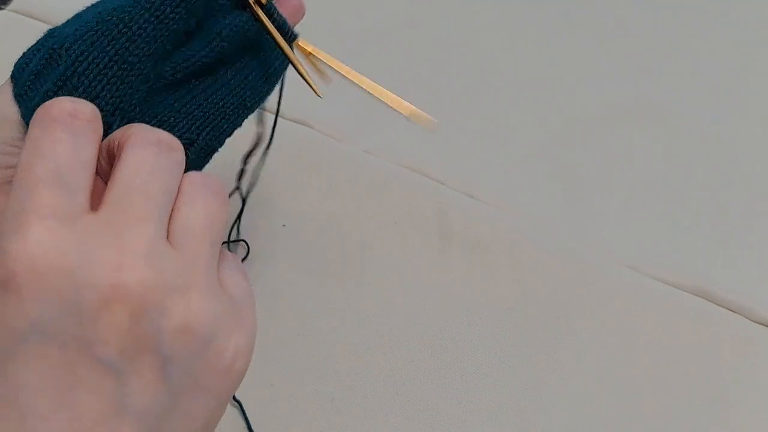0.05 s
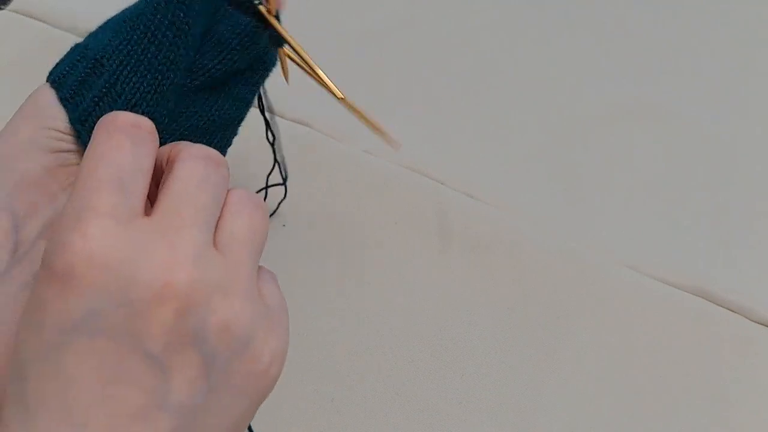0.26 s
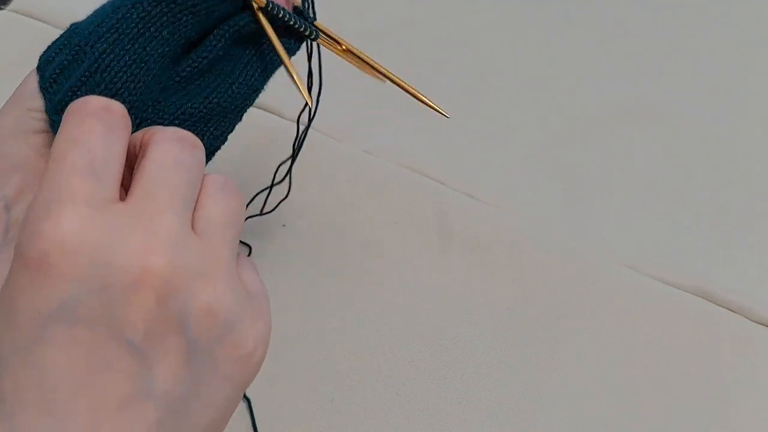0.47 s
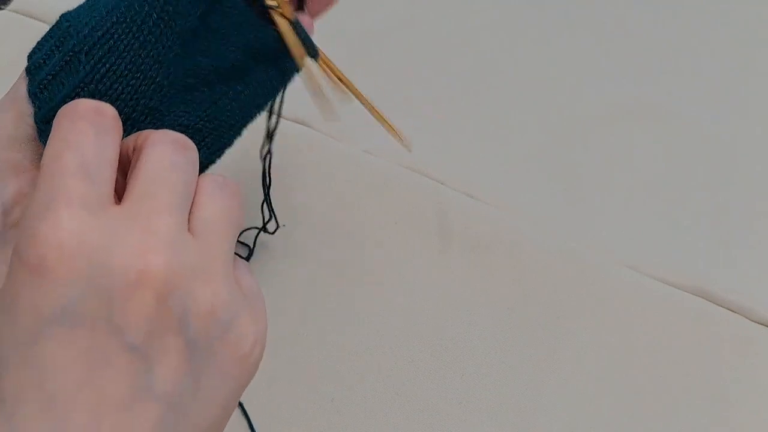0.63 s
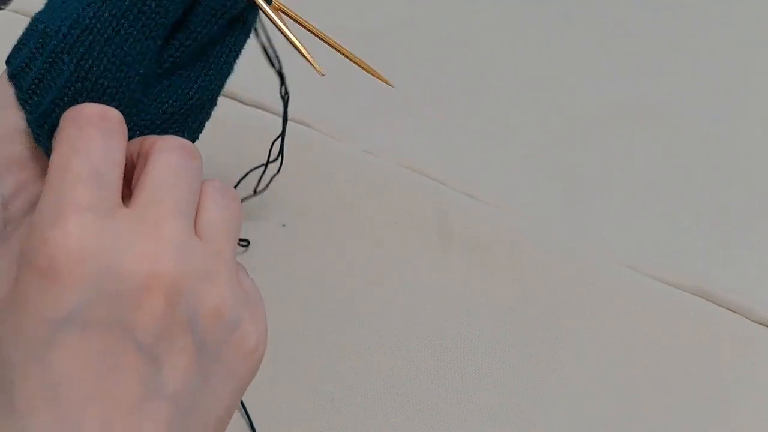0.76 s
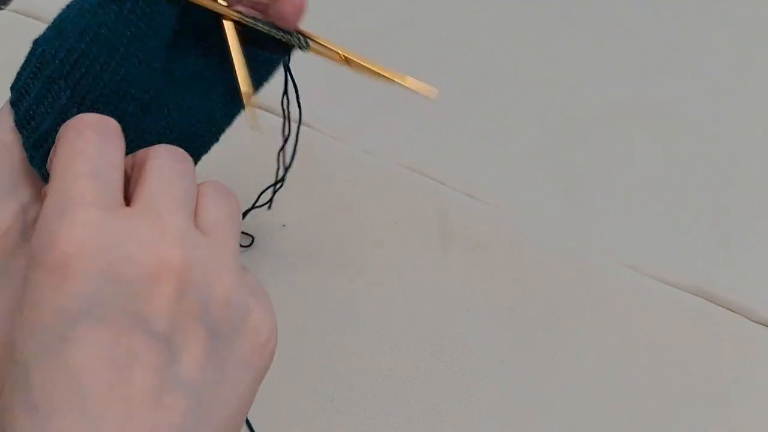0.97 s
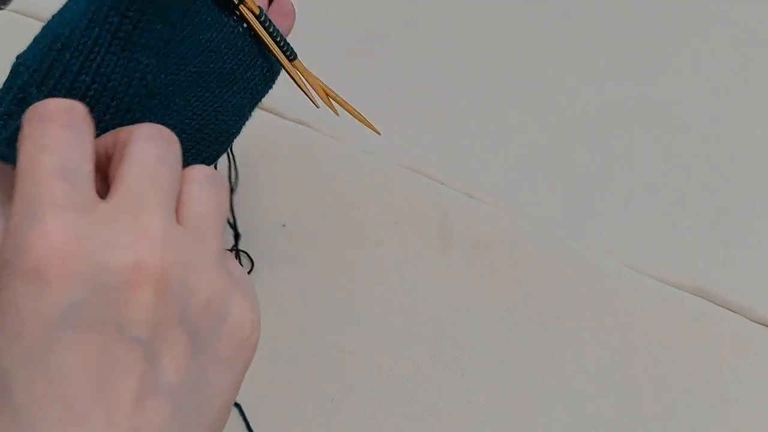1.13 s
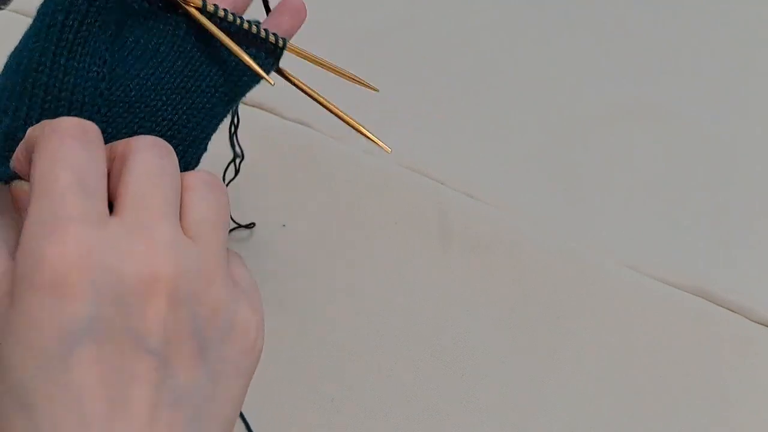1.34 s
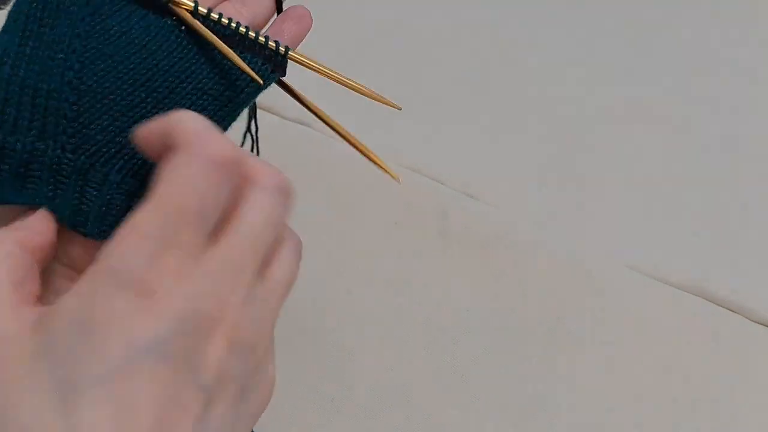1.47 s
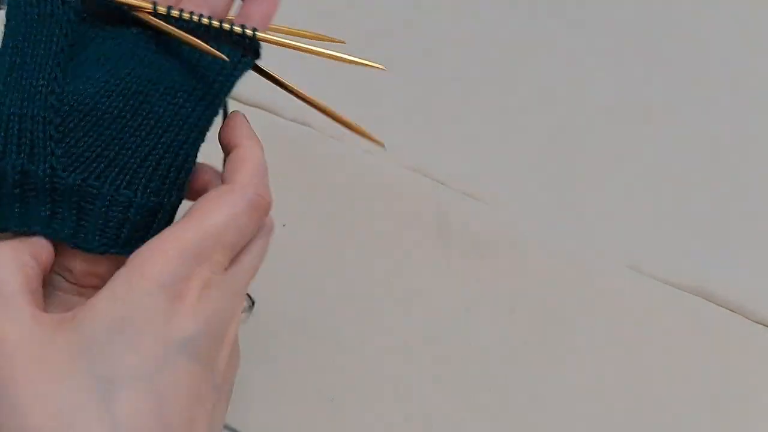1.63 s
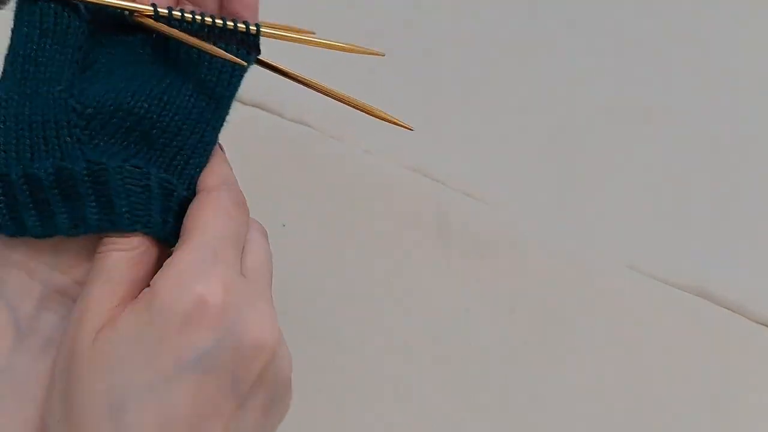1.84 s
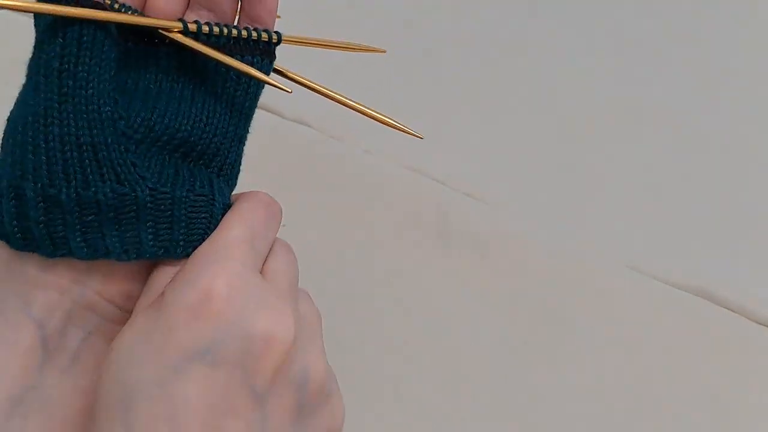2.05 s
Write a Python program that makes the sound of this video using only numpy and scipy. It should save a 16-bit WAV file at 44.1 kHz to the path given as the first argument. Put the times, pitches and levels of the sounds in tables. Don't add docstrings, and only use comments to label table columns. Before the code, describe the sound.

Close to the microphone in a quiet room, metal knitting needles clink, bounce and rattle in several bright bursts, with a low table rumble and wool rustle, then only faint ticks and a few dry taps remain.

```python
import sys
import numpy as np
from scipy import signal
from scipy.fft import rfft, irfft
from scipy.io import wavfile
from scipy.ndimage import uniform_filter1d

SR = 44100
rng = np.random.default_rng(int(sys.argv[2]) if len(sys.argv) > 2 else 0)


def wrap_up_sound(samples):
    columns = np.atleast_2d(samples).T
    tamed = np.clip(columns, -1, 1)
    steps = np.round(tamed * 32767).astype(np.int16)
    wavfile.write(sys.argv[1], SR, steps)


def invert_db(level):
    return 10 ** (np.asarray(level, dtype=float) / 20)


N = 92610

# (time [s], level [dB], pitch [Hz], length [s])
NUDGES = [(0., -31.5, 51.53, 0.1), (0.118, -34, 53.77, 0.15), (0.218, -38, 54.5, 0.12),
          (0.316, -38, 54.4, 0.27), (0.477, -28, 50.6, 0.092), (.6, -23, 48.05, 0.22),
          (0.762, -23.5, 47.3, 0.13), (0.865, -25, 46.45, 0.16), (1.054, -41, 46.46, 0.3),
          (1.215, -35.5, 44.84, 0.08), (1.315, -50, 40.43, 0.16), (1.382, -39.5, 40.2, 0.14),
          (1.481, -38.5, 42.2, 0.077), (1.57, -37.5, 43.56, 0.051), (1.675, -37, 45.3, 0.095),
          (1.755, -38, 46.5, 0.074), (1.825, -41, 43.75, 0.1), (1.948, -44, 43.8, 0.19),
          (2.088, -45, 42.8, 0.16)]
# (multiple of hum, level [dB])
BUZZ_OVERTONES = [(2, -28), (3, -25), (5, -32)]
SWAY_DB, SWAY_HZ = -49.5, 36

# (time [s], level [dB])
RUB = [(0, -50), (.05, -47), (.12, -58), (0.192, -42), (.4, -53.5), (.45, -61), (0.521, -41),
       (0.849, -47.5), (.93, -56), (0.988, -44), (1.04, -52.5), (1.2, -54.5), (1.3, -57), (1.432, -50.5),
       (1.752, -66), (1.801, -44), (1.872, -62.5), (2.1, -50.5)]
# (frequency [Hz], density [dB per Hz])
WOOL_SPECTRUM = [(1500, -14), (2500, -15), (4200, -14.5), (10200, 0), (12100, -11), (14200, -10.5),
                 (16000, -11.5)]

# (frequency [Hz], density [dB per Hz])
AIR_SPECTRUM = [(35, -59), (60, -0.5), (252, -11), (384, -15.5), (497, -19), (815, -19.5), (14300, -39),
                (16500, -45)]
AIR_DB, STIR_DB = -50.5, 2.5
SLEEVE_DB, SLEEVE_AT_S, SLEEVE_SPAN_S = 2.5, 1.5, .15

# (time [s], crack [dB], ring [dB], tilt [dB per octave])
FIRST_HITS = [
    (.2016, 1.5, -4, -0.5),
    (.2048, -2, -7, -2),
    (.2075, -10.5, -43, -8),
    (.2122, -21, -20, 11),
]
REBOUND_HITS = [
    (.2195, -13, -6.5, 7),
    (.2232, -32, -33, -2),
    (.2257, -5, -12.5, 0),
    (.2288, -26, -18, 2),
    (.2341, -11.5, -35, -3.5),
    (.3160, -12, -22.5, -2.5),
    (.3224, -19, -34, 1),
]
RATTLE_HITS = [
    (.4935, -30.5, -40, -9),
    (.5344, -2, -8.5, -3.),
    (.5366, -3, -20, -3),
    (.5490, -3.5, -11, 6),
    (.5529, -20, -11, -2.5),
    (.559, -25, -20, 1),
    (.5685, -14, -13, -2),
    (.5722, -17, -26, 3),
]
PAIR_HITS = [
    (.6200, -3.5, -13.5, 2),
    (.6277, -9, -13, 13),
]
FREE_HITS = [
    (.6870, -18, -5.5, -2.5),
    (.6950, -20.5, -13, 1),
]
KNOCK_HITS = [
    (.7840, -4.5, -8.5, 6),
    (.7915, -15, -18.5, 2),
    (.7955, -27, -21, 6.5),
    (.799, -35, -27, 0),
]
SLIP_HITS = [
    (.8715, -17, -20, 0.86),
    (.8881, -26, -19.5, 5.8),
    (.8902, -30, -30, 4.5),
]
LAST_HITS = [
    (1.0570, -34, -22, 2.1),
    (1.0590, -14, -3, 3.5),
    (1.0622, -33, -16.5, 2.33),
]
AFTER_HITS = [
    (1.1151, -21, -21.5, 0),
    (1.1185, -29, -26, 2),
    (1.133, -34, -31, 0),
]
TICK_HITS = [
    (1.2215, -38, -36, 5),
    (1.2241, -19, -25, 4),
    (1.2272, -29, -30.5, -1),
    (1.2495, -35, -37, -2),
    (1.2535, -24, -35, -1.5),
    (1.2562, -32, -34, 3),
    (1.2762, -34, -44, 1),
]
SMALL_HITS = [
    (1.5512, -25.5, -25.5, 1.5),
    (1.597, -32, -46, 1),
    (1.6581, -22, -38, 3),
    (1.6624, -26.5, -50, 0),
    (1.7893, -23.5, -44, 5),
    (1.795, -30, -53, -2),
    (2.0687, -36, -42, -10),
]

# (frequency [Hz], level [dB], T60 [s])
FIRST_MODES = [(830, -41, 0.047), (2270, -22.5, 0.096), (4367, -7.5, 0.061), (5680, -14, 0.033),
               (6990, -10.5, 0.062), (9800, -27, 0.064), (10130, 5, 0.018), (10720, 5.5, 0.03),
               (13550, -4, 0.041)]
REBOUND_MODES = [(4370, -19, 0.028), (5640, -10.5, 0.026), (7040, -5.5, 0.035), (9440, -2, .03),
                 (10430, 3.5, 0.034), (10670, 4, 0.021), (14100, -0.5, 0.03)]
RATTLE_MODES = [(3030, -13.5, 0.012), (4010, -18, 0.033), (5560, -10, 0.031), (6070, -10, 0.038),
                (7140, -17, .03), (8300, -20, 0.024), (9940, -3, 0.069), (10680, 3, 0.033),
                (11140, 6, 0.016), (12700, -7, .025), (14100, 0, 0.024)]
PAIR_MODES = [(4330, -16, .03), (7000, -9, .11), (9000, -16, .03), (10200, -6, .04), (13500, -2, .02),
              (14100, 0, .017)]
FREE_MODES = [(839, -42, 0.061), (2170, -35.5, .078), (4396, -9, 0.035), (6980, 1, 0.047),
              (9880, 1.5, 0.037), (10060, -9, 0.13), (13790, -8, 0.066)]
KNOCK_MODES = [(860, -16, 0.046), (1830, -11.5, 0.034), (2300, -17.5, 0.11), (4130, -10, 0.027),
               (6000, -11.5, 0.036), (7030, -5.5, 0.057), (8540, -1.5, 0.027), (9890, -7, 0.077),
               (9700, -8, 0.091), (10600, -9, 0.036), (13860, -3.5, 0.038), (15000, -8, 0.023)]
SLIP_MODES = [(3850, -7.5, 0.024), (5350, -9, 0.036), (6500, -3, 0.023), (8320, 2.5, .018),
              (9600, -6, 0.03), (11040, -2.5, 0.028), (14800, -2, 0.016)]
LAST_MODES = [(2285, -21.5, 0.045), (4186, -14, 0.021), (4460, -12.5, 0.026), (5730, -17, 0.037),
              (7226, -20, 0.047), (7780, -17.5, .04), (10100, 5.5, 0.019), (10400, -13, 0.051),
              (13550, -12, .03)]
AFTER_MODES = [(4250, -3, 0.016), (5740, -26, .02), (7950, -8, 0.031), (10200, 0, .02),
               (11600, -0.5, 0.031), (14000, -5, .03), (15700, -6, .016)]
TICK_MODES = [(3660, -16, 0.025), (6000, -4.5, 0.039), (9230, 1, 0.027), (10400, 2, 0.023),
              (12300, -18, 0.018), (13900, -3, .025)]
SMALL_MODES = [(5170, -13, 0.035), (6400, -14.5, 0.035), (8390, 4.5, 0.027), (9700, -3.5, 0.033),
               (14034, -12, .03), (14900, -20, 0.024)]

# (frequency [Hz], density [dB per Hz])
CRACK_SPECTRUM = [(710, -68), (1200, -33), (4280, -12), (8000, -3.5), (10300, 1.5), (14200, -10),
                  (16500, -14.5)]
CRACK_T60_S, AFTER_T60_S, AFTER_DB, LUMPY_DB = 0.0073, 0.13, -19, 4.5
CHATTER_SHARE, CHATTER_WIDTH_RATIO, CHATTER_HZ, CHATTER_S = .8, .026, 60, .008
DETUNE_RATIO, LINGER_DB, LINGER_T60_RATIO = 0.0063, -27, 9.7
ROOM_DB, ROOM_T60_S = -18.5, 0.22

# (time
# [s], length [s], level [dB], frequency [Hz])
SCRAPES = [(0.345, .06, -47.5, 9140), (0.35, 0.052, -50.5, 11200), (0.492, 0.031, -48.5, 8300),
           (0.851, 0.024, -45, 9100), (0.864, 0.037, -49, 3850), (0.957, 0.052, -55, 10400),
           (1.209, 0.013, -56.5, 6030), (1.238, 0.017, -45, 8940), (1.244, .014, -63, 6030),
           (1.768, 0.11, -62, 5040), (2.013, 0.13, -60.5, 3800), (1.631, 0.1, -46.5, 90),
           (.534, 0.018, -31.5, 2930), (.535, 0.073, -50.5, 1540), (1.865, 0.071, -49, 245),
           (0.864, 0.011, -38, 15200)]
SCRAPE_WIDTH_RATIO, GRAIN_DB, GRAIN_HZ = .08, 4, 403

# (time [s], length [s], level [dB], start [Hz], end [Hz])
SLIDES = [
    (.853, .014, -45, 11200, 12300),
    (.856, .019, -46, 5500, 5300),
    (.877, .009, -51, 6000, 6900),
    (1.13, .013, -42, 11400, 11100),
    (1.146, .014, -53, 8300, 9200),
    (.493, .022, -49, 10500, 10800),
]
SLIDE_WIDTH_RATIO = .06


def evened(x):
    return x / np.sqrt(np.mean(x ** 2) + 1e-20)


def coloured(x, points):
    f, db = np.transpose(points)
    hz = np.fft.rfftfreq(len(x), 1 / SR)
    gain_db = np.interp(np.log(hz + 1), np.log(f + 1), db)
    return irfft(rfft(x) * invert_db(gain_db), len(x))


def wobble(shape, width_hz):
    z = rng.standard_normal(shape) + 1j * rng.standard_normal(shape)
    hz = np.fft.fftfreq(shape[-1], 1 / SR)
    z = np.fft.ifft(np.fft.fft(z) / (1 + (2 * hz / width_hz) ** 2))
    return z / np.sqrt(np.mean(abs(z) ** 2, -1, keepdims=True))


def add(mix, start_s, sound):
    part = mix[max(round(start_s * SR), 0):][:len(sound)]
    part += sound[:len(part)]


def table():
    t = np.arange(N) / SR
    at_s, _, hz, _ = np.transpose(NUDGES)
    phase = 2 * np.pi * np.cumsum(np.interp(t, at_s, hz)) / SR
    push = np.zeros(N)
    for s, db, _, length_s in NUDGES:
        push += invert_db(db) * np.cos(np.pi * np.clip((t - s) / length_s, -.5, .5))
    buzz = np.zeros(N)
    for multiple, db in BUZZ_OVERTONES:
        buzz += invert_db(db) * (wobble((N,), 21.0) * np.exp(1j * multiple * phase)).real
    sway = invert_db(SWAY_DB) * (wobble((N,), 7.5) * np.exp(2j * np.pi * SWAY_HZ * t)).real
    return np.sqrt(2) * (push * (np.sin(phase) + buzz) + sway)


def wool():
    s, db = np.transpose(RUB)
    snag_size = invert_db(3.5 * np.minimum(rng.exponential(1, N), 5))
    snags = snag_size * (rng.random(N) < 2500 / SR) * rng.standard_normal(N)
    z = signal.stft(rng.standard_normal(N) + 0.48 * evened(snags), nperseg=256)[2]
    patches = uniform_filter1d(rng.standard_normal(z.shape), 5, axis=0)
    patches = evened(uniform_filter1d(patches, 12, axis=1))
    hiss = signal.istft(z * invert_db(2.0 * patches), nperseg=256)[1][:N]
    return evened(coloured(hiss, WOOL_SPECTRUM)) * invert_db(np.interp(np.arange(N) / SR, s, db))


def air():
    t = np.arange(N) / SR
    sleeve_db = SLEEVE_DB * np.exp(-((t - SLEEVE_AT_S) / SLEEVE_SPAN_S) ** 2)
    stir_db = STIR_DB * wobble((N,), 8.5).real
    hiss = evened(coloured(rng.standard_normal(N), AIR_SPECTRUM))
    return invert_db(AIR_DB + sleeve_db + stir_db) * hiss


def clinks(hits, modes):
    out, t = np.zeros(N), np.arange(8192) / SR
    hz, db, t60_s = np.transpose(modes)[:, :, None]
    fall_db = -60 * t / np.clip(t60_s, .015, .2)
    decay = invert_db(fall_db) + invert_db(LINGER_DB + fall_db / LINGER_T60_RATIO)
    share = CHATTER_SHARE * np.minimum(t / CHATTER_S, 1)
    crack_decay = invert_db(-60 * t / CRACK_T60_S) + invert_db(AFTER_DB - 60 * t / AFTER_T60_S)
    onset = np.minimum(t / 0.0007, 1)
    for s, crack_db, ring_db, tilt_db in hits:
        detune = 1 + DETUNE_RATIO * rng.standard_normal((len(modes), 1))
        chatter = wobble(fall_db.shape, CHATTER_WIDTH_RATIO * hz + CHATTER_HZ)
        rough = 1 - share + share * chatter
        size = invert_db(db + tilt_db * np.log2(hz / 9000)) * decay
        tones = (rough * np.exp(2j * np.pi * hz * detune * t)).imag
        ring = (size * tones).sum(0)
        tilted = [(f, d + tilt_db * np.log2(f / 9000)) for f, d in CRACK_SPECTRUM]
        noise = evened(coloured(rng.standard_normal(len(t)), tilted))
        lumps = evened(uniform_filter1d(rng.standard_normal(4097), size=120))
        crack = evened(irfft(rfft(noise) * invert_db(LUMPY_DB * lumps))) * crack_decay
        add(out, s, onset * .5 * (invert_db(crack_db) * crack + invert_db(ring_db) * ring))
    return out


def room(x):
    taps = np.zeros(8000)
    at = np.arange(60, 7960, 20) + rng.integers(0, 20, 395)
    taps[at] = rng.choice([-1., 1.], 395) * invert_db(-60 * at / SR / ROOM_T60_S)
    return signal.fftconvolve(x, taps / np.linalg.norm(taps))[:N]


def scrapes():
    out, t = np.zeros(N), np.arange(8192) / SR
    for s, length_s, db, hz in SCRAPES:
        line = wobble(t.shape, SCRAPE_WIDTH_RATIO * hz) * np.exp(2j * np.pi * hz * t)
        grain_db = GRAIN_DB * (hz > 2000) * wobble(t.shape, GRAIN_HZ).real
        swell = np.sin(np.pi * np.clip(t / length_s, 0, 1) ** 0.31) ** .5
        add(out, s, np.sqrt(2) * invert_db(db + grain_db) * line.real * swell)
    return out


def slides():
    out, t = np.zeros(N), np.arange(4096) / SR
    for s, length_s, db, start_hz, end_hz in SLIDES:
        way = np.clip(t / length_s, 0, 1)
        hz = start_hz + (end_hz - start_hz) * way
        fuzz = .5 + wobble(t.shape, SLIDE_WIDTH_RATIO * start_hz)
        tone = (fuzz * np.exp(2j * np.pi * np.cumsum(hz) / SR)).real
        add(out, s, np.sqrt(2) * invert_db(db) * tone * np.sin(np.pi * way) ** .5)
    return out


def scene():
    contacts = [
        (FIRST_HITS, FIRST_MODES), (REBOUND_HITS, REBOUND_MODES), (RATTLE_HITS, RATTLE_MODES),
        (PAIR_HITS, PAIR_MODES), (FREE_HITS, FREE_MODES), (KNOCK_HITS, KNOCK_MODES),
        (SLIP_HITS, SLIP_MODES), (LAST_HITS, LAST_MODES), (AFTER_HITS, AFTER_MODES),
        (TICK_HITS, TICK_MODES), (SMALL_HITS, SMALL_MODES)]
    bed = table() + wool() + air()
    needles = sum(clinks(hits, modes) for hits, modes in contacts) + scrapes() + slides()
    return (bed + needles + invert_db(ROOM_DB) * room(needles))[None]


def band_limit(x):
    return signal.sosfilt(signal.butter(12, 16970, fs=SR, output="sos"), x)


def record(dry):
    lowpass = signal.firwin(801, 15900, window=("kaiser", 8), fs=SR)
    low = signal.oaconvolve(dry, lowpass[None], "same")
    top = dry - low
    gate = np.clip(uniform_filter1d(abs(top), size=128) / invert_db(-29), 0, 1) ** 2
    mix = low + gate * top
    return band_limit(mix)


dry = scene()
out = record(dry)
wrap_up_sound(out)
```